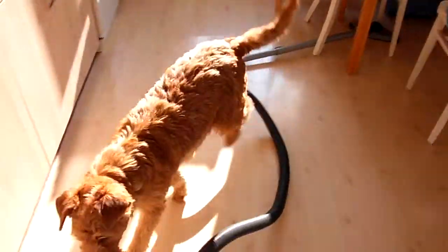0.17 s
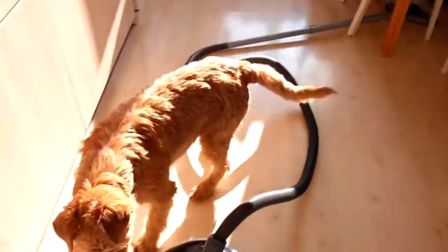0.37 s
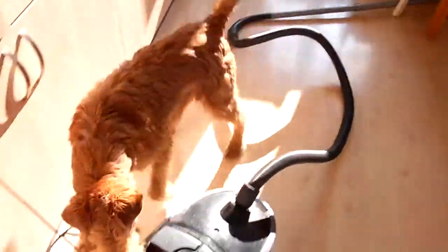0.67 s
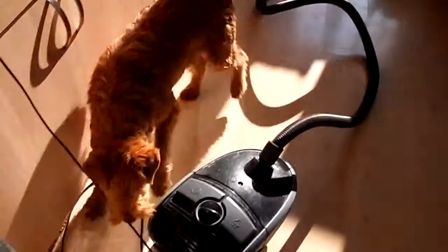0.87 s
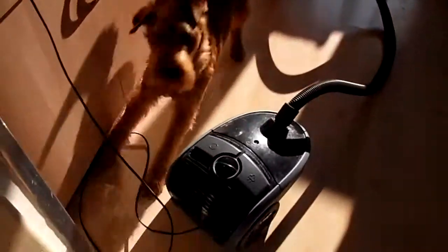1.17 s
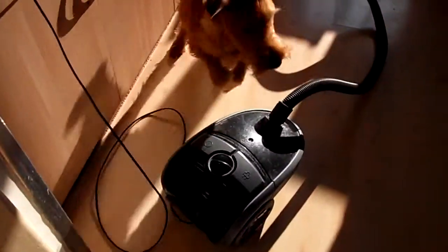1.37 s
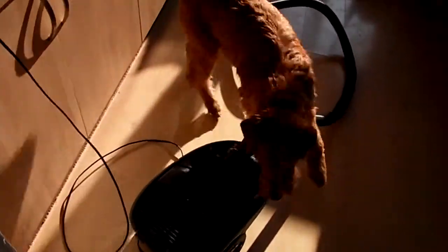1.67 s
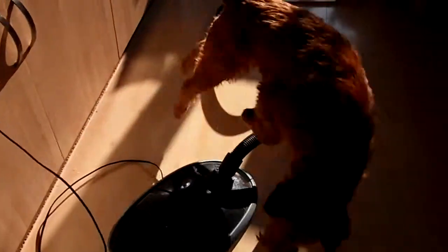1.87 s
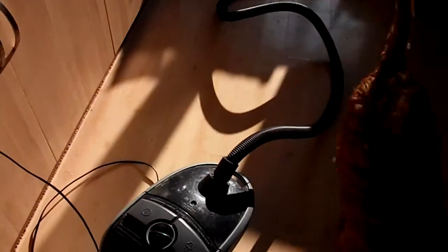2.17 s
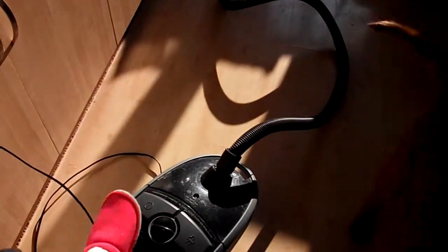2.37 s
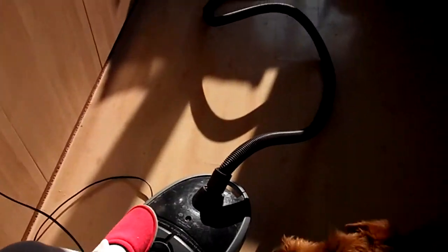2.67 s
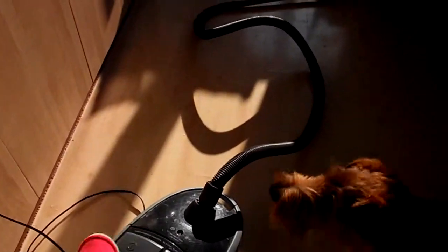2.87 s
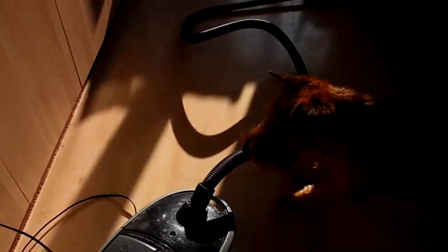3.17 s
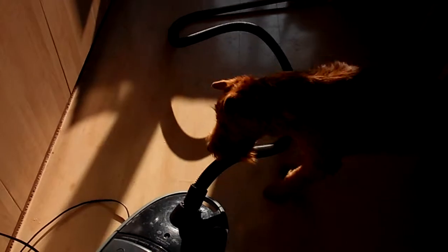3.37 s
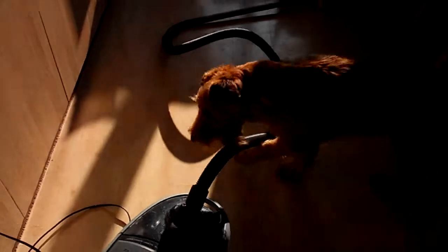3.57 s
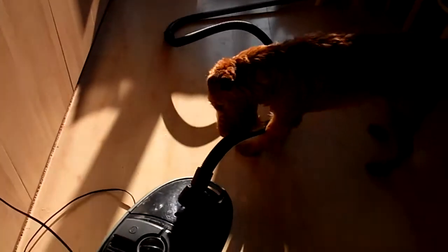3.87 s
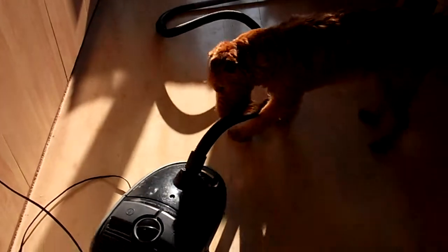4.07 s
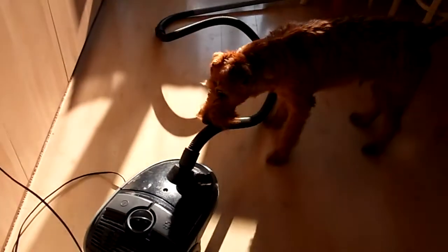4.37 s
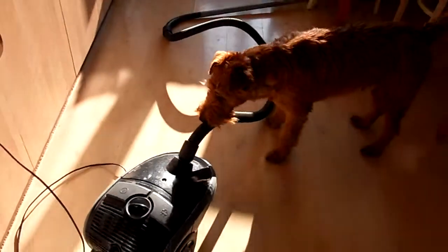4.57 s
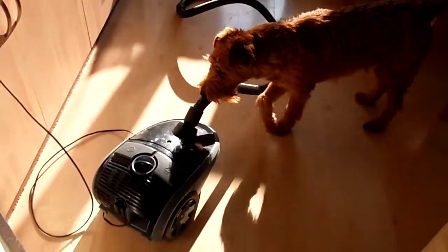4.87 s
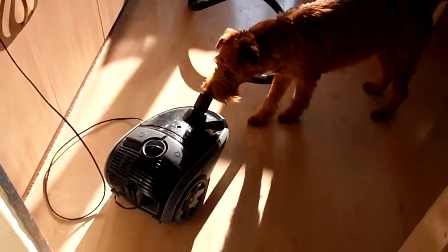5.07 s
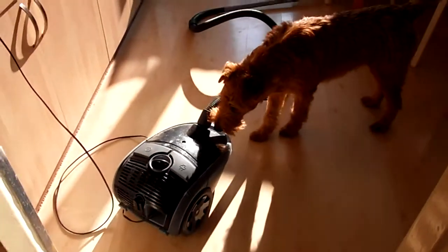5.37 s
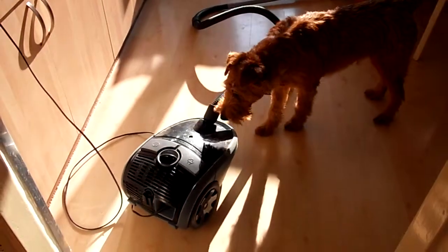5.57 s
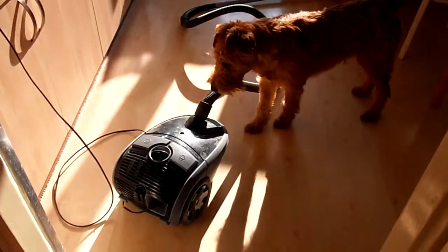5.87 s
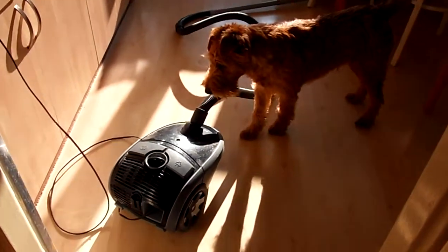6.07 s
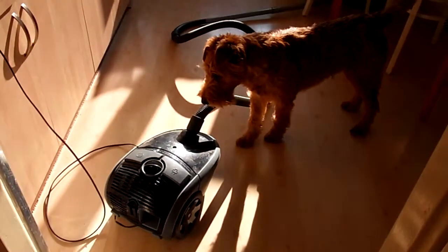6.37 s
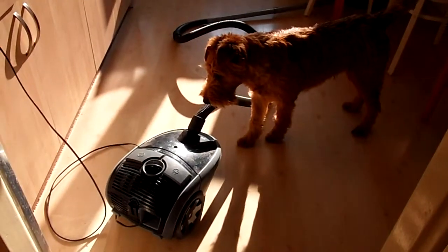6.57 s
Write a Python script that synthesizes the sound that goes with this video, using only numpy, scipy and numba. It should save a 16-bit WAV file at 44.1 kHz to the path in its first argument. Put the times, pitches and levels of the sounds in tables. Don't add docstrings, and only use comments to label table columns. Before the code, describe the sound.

Close in a hard-floored kitchen, a canister vacuum revs up with a rushing roar while a dog growls briefly and woofs through a shut mouth. A hard plastic click switches it off, and the whine and rush slide downward. The dog snarls, gives one fierce bark that distorts the handheld microphone, then grumbles against the hose. Thin hiss and tiny squeaks fade out.

```python
import sys
import numpy as np
from scipy import signal
from scipy.fft import rfft, irfft, next_fast_len
from scipy.io import wavfile
from scipy.ndimage import uniform_filter1d
from numba import njit

SR = 44100
rng = np.random.default_rng(int(sys.argv[2]) if len(sys.argv) > 2 else 0)


def rack_gain(trim_db):
    fader = np.asarray(trim_db, float)
    return 10 ** (fader / 20)


def dump(signal):
    limited = np.clip(np.atleast_2d(signal).T, -1, 1)
    pcm = np.round(limited * 32767).astype(np.int16)
    wavfile.write(sys.argv[1], SR, pcm)


N = 295911

# time in seconds, pitch in Hz, level in dB, length in seconds.
BUMPS = [
    (2.818, 99, -47, .02),
    (3.36, 60, -61, 0.046),
]
# time in seconds, level in dB, push in ms.
CLICKS = [
    (2.642, -8, .15),
    (4.07, -31, 0.26),
]
# mode in Hz, level in dB, T60 in seconds.
PEDAL_MODES = [(638, -5, .03), (862, 8, 0.018), (1610, 1, .03), (2200, -9, .02), (4200, -8, .01)]

START_HZ, GOAL_HZ, SPIN_UP_S, CEILING_HZ = 389.5, 1125.5, 4.267, 704
OFF_S, OFF_HZ, DRAG_KNEE_HZ, DRAG_PER_S = 2.63, 697, 168.56, .19305

# frequency in Hz, density in dB per Hz.
RUNNING_SPECTRUM = [(24, -66), (40, -38.5), (183, -22.5), (301, -11), (390, -21), (440, -14.5), (674, -9.5),
                    (1010, -10.5), (1620, -10.5), (1870, -5), (2940, 3), (5710, -6.5), (7070, -9.5),
                    (10100, -16), (11600, -36.5), (15100, -68), (22000, -120)]
COASTING_SPECTRUM = [(24, -44), (40, -7.5), (103, -23), (144, -17.5), (507, -18.5), (940, -6),
                     (1510, -10.5), (2940, -2), (4290, -15.5), (5070, -14), (9620, -16), (10800, -34),
                     (11600, -51.5), (15100, -79.5), (22000, -120)]
# centre in Hz, width in Hz, boost in dB.
CASING = [(745, 48, -1.5), (1270, 91, 3.5), (1604, 100, 10.5), (2660, 350, 1.5), (2870, 220, -3),
          (10630, 1200, 7)]
# frequency in Hz, correlation from -1 to 1.
LIKENESS = [(60, 0.86), (130, 1), (270, 0.9), (560, 0.78), (1190, 0.035), (2510, 0.26), (5300, -0.2),
            (11200, -0.36)]
# frequency in Hz, left minus right in dB.
LEAN = [(60, -5), (110, -0.5), (190, -1.5), (340, -2), (610, -1.5), (1100, -1.5), (1960, 0.5), (3500, -7),
        (6250, -4), (11200, 8)]
# time in seconds, level in dB, left minus right in dB.
FLOW = [(0, -35.5, -6.5), (.43, -30, -4.5), (1.06, -24.5, -9), (2.26, -19, -6), (2.63, -22, -7.5),
        (2.99, -25.5, -5.5), (3.94, -32.5, -4.5), (4.17, -35, -5.5), (4.65, -35.5, -2), (4.9, -37.5, -5),
        (5.06, -40.5, -7), (5.42, -42.5, -7.5), (5.53, -42.5, -6), (5.6, -45, -6), (5.72, -43, -7.5),
        (6.56, -49.5, -6.5), (6.71, -49, -2)]
START_RUMBLE_DB_PER_OCT, START_RUMBLE_S = 9, 0.29
COAST_TREBLE_DB_PER_OCT, COAST_TOP_DB_PER_OCT = 4.2, -14.5

# start and
# end in seconds, first and last centre in Hz, level in dB.
RIDGES = [(4.5, 5.35, 11000, 7400, -48), (5.2, 6.12, 8050, 7600, -48), (5.98, 7, 7650, 5350, -52.5),
          (4.15, 4.95, 8900, 6900, -51), (4.4, 6.3, 6280, 6180, -51), (5.45, 6.1, 5950, 4700, -49),
          (6.05, 6.8, 4840, 4500, -49), (5.4, 5.85, 10700, 10300, -64.5), (6.4, 6.9, 11300, 10000, -63),
          (1.85, 2.5, 10100, 12000, -38)]
RIDGE_EDGE_S, RIDGE_WIDTH_HZ, RIDGE_FLICKER_DB = 0.088, 720.0, 3

# shaft speed in Hz, level in dB.
SHAFT_LINE = [(108, -85), (122, -63.5), (140, -73.5), (190, -68), (270, -60), (292, -80), (375, -54),
              (700, -63)]
BLADE_LINE = [(110, -71.5), (190, -76), (250, -52), (310, -73), (400, -59), (485, -57), (520, -42),
              (700, -45)]
BAR_LINE = [(110, -81), (132, -74), (155, -46), (250, -50.5), (290, -58), (314, -58), (330, -70.5),
            (700, -78.5)]
OCTAVE_LINE = [(110, -76.5), (148, -64), (160, -54.5), (210, -81), (300, -84), (700, -84.5)]
# centre in Hz, width in Hz, boost in dB.
HOUSING = [(533, 19, 8), (564, 20, 12.5), (692, 40, 17.5), (2850, 270, 4.5), (3830, 120, 11),
           (4736, 120, 7.5), (4984, 160, 9), (5544, 110, 10), (5840, 62, 11.5), (6190, 180, 6.5),
           (7230, 150, 4.5)]
# time in seconds, pitch in Hz, length in seconds, level in dB.
SQUEAKS = [(6.2, 9600, .04, -54), (6.33, 9000, 0.057, -58), (6.6, 10700, 0.038, -52),
           (6.693, 8080, .03, -47.5), (5.683, 10500, .03, -53), (6.579, 11370, 0.035, -60),
           (6.7, 4000, .04, -53)]
POWERED_BLADE_DB, LINE_FLICKER_DB = 4.5, 1.6

# peak in seconds, level in dB, attack and hold in seconds, release in dB per s.
GROWL = ((0, .21, 176, 21, 181, 3), (20, 12, .42, .4, .18, 0.027), [(0, -30, .01, 0.45, 100),
          (.19, -27, 0.019, .002, 3000)])
MUFFLED_WOOF = ((0.15, 0.54, 200, 1000, 223, 4), (9.4, 2, 0.13, 0.2, .245, 0.045),
                 [ (.187, -21, .012, .002, 300), (.212, -11, .011, .028, 800), (.266, -15, .018, .028, 800),
                 (.316, -23, .01, .014, 900), (.39, -40.5, 0.028, 0.052, 400)])
SNARL = ((2.78, 3.0, 120, 61, 200, 0.1), (15, 8, .5, .4, 3.8, .02), [(2.81, -39.5, .03, 0.077, 100.7),
          (2.92, -28.5, .06, 0.089, 450)])
YELP = ((2.96, 3.06, 246, 1580, 353, 20), (0, 0, .03, .06, 3.02, .01), [(3.018, -9, .05, .005, 400)])
BARK = ((3.0, 3.36, 312, 1600, 352, 35), (1, 3, .16, .24, 3.04, .02), [ (3.035, -4.5, .032, .035, 170),
         (3.15, -15, .012, .002, 300), (3.22, -25, .02, .002, 260)])
GRUMBLE = ((3.46, 3.97, 150, 160, 176, 2.8), (1.8, 7.3, 0.24, .3, 3.3, 0.054),
            [ (3.49, -32, 0.022, 0.033, 50), (3.57, -27.5, .07, .04, 61.5),
            (3.66, -23.5, 0.056, 0.017, 130), (3.815, -28.5, 0.15, .01, 200)])
# centre in Hz, width in Hz, level in dB.
LIPS_SHUT = [(121, 50, -22.5), (200, 160, -8), (400, 210, -0.5), (660, 140, -4.5), (1005, 100, -4.5),
             (2000, 270, -10.5)]
CHEEKS = [(168, 40, -21.5), (449, 89, -3), (625, 57, -21), (970, 260, -13.5), (1103, 100, -21),
          (1870, 170, -19)]
JAWS_OPENING = [(342, 200, -22), (650, 260, -1), (1000, 140, -5), (1600, 560, -1), (2210, 400, -9)]
JAWS_WIDE = [(270, 55, -18), (501, 90, -4), (680, 320, -13.5), (1013, 140, 0), (1400, 370, -19),
             (1700, 220, -2), (1947, 110, -11.5), (2002, 110, -7.5), (3000, 1200, -14), (5500, 3000, -25)]
TEETH_ON_HOSE = [(128, 43, -16.5), (166, 70, -11), (271, 45, -9.5), (536, 260, -6.5), (736, 95, 3),
                 (885, 35, -8.5), (989, 140, -1.5), (2094, 170, -3)]
# time in seconds, rate in Hz, depth as a ratio.
FLUTTER = [(3.018, 470, 0), (3.036, 496, 1.6), (3.07, 499, 2.2), (3.11, 503, 1.6), (3.2, 515, 1.2)]
BLAST_DB, BLAST_HZ = -16, 2500

# delay in ms, left level in dB, right level in dB.
BOUNCES = [(2.3, -17.5, -15), (5.1, -17, -14.5), (8.7, -25.5, -16.5), (13.9, -15.5, -9.5)]
KITCHEN_T60_S, KITCHEN_DAMP, LINES_IN_ROOM_DB = 0.4, 0.62, -17


def on_log(hz, table):
    table_hz, values = np.transpose(table)
    return np.interp(np.log(hz), np.log(np.maximum(table_hz, 1)), values)


def curves(table):
    s, *columns = np.transpose(table)
    return [np.interp(np.arange(N) / SR, s, c) for c in columns]


def unit(x):
    return x / np.sqrt(np.mean(x ** 2))


def walk(rate_hz):
    hold = int(SR / rate_hz)
    levels = rng.standard_normal(1000)
    steps = np.repeat(levels[:N // hold + 1], hold)
    return uniform_filter1d(uniform_filter1d(steps, hold), hold)[:N]


def lorentz(hz, peaks):
    return sum(db / (1 + (2 * (hz - centre) / width) ** 2) for centre, width, db in peaks)


@njit
def svf(x, hz, width_hz):
    y, band, low = np.empty(len(x)), 0., 0.
    for i in range(len(x)):
        g, k = np.tan(np.pi * hz[i] / SR), width_hz / hz[i]
        v = (band + g * (x[i] - low)) / (1 + g * (g + k))
        band, low, y[i] = 2 * v - band, low + 2 * g * v, k * v
    return y


def handling():
    lowpass = signal.butter(2, 70, fs=SR, output="sos")
    low = signal.sosfilt(lowpass, rng.standard_normal((2, N)))
    return unit(low) * rack_gain(-72.5 + 3 * walk(4))


def bumps():
    t = np.arange(N) / SR
    return sum(rack_gain(db) * np.exp(-((t - s) / length_s) ** 2) * np.sin(2 * np.pi * hz * t)
               for s, hz, db, length_s in BUMPS)


def clicks():
    t = np.arange(SR // 8) / SR
    out = np.zeros(N)
    for s, db, push_ms in CLICKS:
        ring = sum((-1) ** k * rack_gain(mode_db) * np.sin(2 * np.pi * hz * t) * 1000. ** (-t / t60_s)
                   for k, (hz, mode_db, t60_s) in enumerate(PEDAL_MODES))
        ring += 0.52 * rng.standard_normal(len(t)) * np.exp(-t / 0.0023)
        push = signal.windows.hann(int(push_ms * SR / 1000) + 3)
        ring = np.convolve(ring, push)[:len(t)]
        first = int(s * SR)
        out[first:first + len(t)] += rack_gain(db) * ring / np.abs(ring).max()
    return signal.sosfilt(signal.butter(2, 450, "highpass", fs=SR, output="sos"), out)


def shaft():
    t = np.arange(N) / SR
    driven = np.minimum(GOAL_HZ - (GOAL_HZ - START_HZ) * np.exp(-t / SPIN_UP_S), CEILING_HZ)
    angle = np.arctan(OFF_HZ / DRAG_KNEE_HZ) - DRAG_PER_S * np.maximum(t - OFF_S, -.05)
    coast = DRAG_KNEE_HZ * np.tan(angle)
    return uniform_filter1d(np.minimum(driven, coast), size=SR // 25)


def bearings():
    t, out = np.arange(N) / SR, np.zeros((2, N))
    flicker = rack_gain(RIDGE_FLICKER_DB * walk(11))
    for start_s, end_s, first_hz, last_hz, db in RIDGES:
        a, b = int(start_s * SR), min(int(end_s * SR), N)
        here = t[a:b]
        hz = np.interp(here, [start_s, end_s], [first_hz, last_hz])
        swell = rack_gain(db) * np.clip(np.minimum(here - start_s, end_s - here) / RIDGE_EDGE_S, 0, 1)
        for ear in range(2):
            noise = rng.standard_normal(2 * SR)[:b - a]
            hiss = svf(svf(noise, hz, RIDGE_WIDTH_HZ), hz, RIDGE_WIDTH_HZ)
            out[ear, a:b] += swell * unit(hiss) * np.roll(flicker, rng.integers(N))[a:b]
    return out


def air(shaft_hz):
    level_db, pan_db = curves(FLOW)
    bass_db = START_RUMBLE_DB_PER_OCT * np.exp(-np.arange(N) / SR / START_RUMBLE_S)
    size = next_fast_len(N)
    f = np.maximum(np.arange(size // 2 + 1) * SR / size, 1)
    casing = rack_gain(lorentz(f, CASING) + on_log(f, RUNNING_SPECTRUM))
    mid, side = (rfft(rng.standard_normal(size)) * casing for _ in range(2))
    norm = np.sqrt(2 * np.sum(np.abs(mid[(f > 2400) & (f < 4500)]) ** 2)) / size
    slow = np.clip((420 - shaft_hz) / 280, 0, 1) * (np.arange(N) > N // 3)
    out, gust = 0, walk(3.46)
    for hz in 40 * 2 ** (np.arange(26) / 3):
        window = np.cos(np.pi / 2 * np.clip(3 * np.log2(f / hz), -1, 1))
        like = np.clip(on_log(hz, LIKENESS), -.9, .99)
        m = np.sqrt(1 + like) * irfft(mid * window, size)[:N]
        s = np.sqrt(1 - like) * irfft(side * window, size)[:N]
        octaves = np.log2(hz / 3200)
        treble = max(octaves, 0)
        db = slow * (on_log(hz, COASTING_SPECTRUM) - on_log(hz, RUNNING_SPECTRUM))
        db = db + COAST_TREBLE_DB_PER_OCT * slow * treble
        db = db + COAST_TOP_DB_PER_OCT * slow ** 2 * max(octaves - 1.2, 0)
        db = db + bass_db * min(-octaves, 2) * (octaves < 0)
        db = db + 1.1 * gust + (0.83 + .5 * treble) * walk(11)
        lean_db = on_log(hz, LEAN) + min(hz / 2500, 1) * (pan_db + 6.5)
        gain = rack_gain(db + np.array([lean_db, -lean_db]) / 2)
        out = out + gain * np.array([m + s, m - s]) / np.sqrt(1 + like)
    return out * rack_gain(level_db - 2.0) / norm


def motor(shaft_hz):
    t = np.arange(N) / SR
    turn = 2 * np.pi * np.cumsum(shaft_hz * (1 + .0015 * walk(60))) / SR
    powered_db = POWERED_BLADE_DB * np.clip((OFF_S - t) / 0.065, 0, 1)
    out = np.zeros(N)
    for order, line in ((1, SHAFT_LINE), (9, BLADE_LINE), (18, BAR_LINE), (36, OCTAVE_LINE)):
        db = on_log(shaft_hz, line) + lorentz(order * shaft_hz, HOUSING) + 6.0
        db = db + (order == 9) * powered_db + LINE_FLICKER_DB * walk(14)
        out += rack_gain(db) * np.sin(order * turn)
    for s, hz, length_s, db in SQUEAKS:
        order = hz / shaft_hz[int(s * SR)]
        out += rack_gain(db + 3 * walk(120)) * np.exp(-((t - s) / length_s) ** 2) * np.sin(order * turn)
    return out


def blast():
    t = np.arange(N) / SR
    lowpass = signal.butter(1, BLAST_HZ, fs=SR, output="sos")
    rush = signal.sosfilt(lowpass, rng.standard_normal((2, N)))
    return unit(rush) * rack_gain(BLAST_DB) * np.exp(-((t - 3.06) / .035) ** 2)


@njit
def folds(hz, rough, weak, chance):
    pulses, phase, p, k = np.zeros(len(hz) + 1), np.empty(len(hz)), 0., 0
    for i in range(len(hz)):
        step = hz[i] * np.exp(rough[i] * chance[k, 0]) / SR
        p += step
        if p >= 1:
            p, k = p - 1, k + 1
            size = np.exp(rough[i] * chance[k, 1]) * (weak[i] if k % 2 else 1.)
            pulses[i] += size * p / step
            pulses[i + 1] += size * (1 - p / step)
        phase[i] = p
    return pulses[:-1], phase


def effort(pushes, t):
    power = 0
    for s, db, attack_s, hold_s, release in pushes:
        swell = np.sin(np.pi / 2 * np.clip((t - s) / max(attack_s, .001) + 1, 0, 1)) ** 2
        power = power + (swell * rack_gain(db - release * np.maximum(t - s - hold_s, 0))) ** 2
    return np.sqrt(power) * np.clip((t[-1] - t) / 0.02, 0, 1)


def voice(call, throat, flutter=None):
    pitch, fold_state, pushes = call
    start_s, end_s, first_hz, climb, top_hz, sag = pitch
    weak_db, late_db, rough, late_rough, change_s, blend_s = fold_state
    a, b = int(start_s * SR), int(end_s * SR)
    t = np.arange(a, b) / SR
    hz = np.minimum(first_hz + climb * (t - start_s), top_hz - sag * (t - start_s))
    later = np.clip((t - change_s) / (2 * max(blend_s, .001)) + .5, 0, 1)
    rough = np.clip(rough + (late_rough - rough) * later, 0, 1)
    weak = rack_gain(-weak_db - (late_db - weak_db) * later)
    chance = rng.standard_normal((400, 2)) * [.2, .55]
    pulses, phase = folds(hz, rough, weak, chance)
    if flutter:
        flutter_hz, depth = (c[a:b] for c in curves(flutter))
        wobble = 1 + .03 * walk(90)[a:b]
        pulses = pulses * (1 + depth * np.cos(2 * np.pi * np.cumsum(flutter_hz * wobble) / SR))
    breath = rng.standard_normal(SR)[:b - a] * np.exp(-phase / 0.22)
    source = unit(pulses) + 2.73 * rough * unit(breath)
    rung = np.zeros(b - a)
    for k, (centre_hz, width_hz, db) in enumerate(throat):
        centre = centre_hz * np.ones(b - a)
        formant = svf(svf(source, centre, 1.4 * width_hz), centre, 1.4 * width_hz)
        rung += (-1) ** k * rack_gain(db) * unit(formant)
    out = np.zeros(N)
    out[a:b] = unit(rung) * effort(pushes, t)
    return out


def ports(x, pan_db, lag_samples):
    right = np.interp(np.arange(N) - lag_samples, np.arange(N), x)
    return np.array([x * rack_gain(pan_db / 2), right * rack_gain(-pan_db / 2)])


@njit
def walls(x, lags, gain, damp):
    line, soft, out = np.zeros((8, 4096)), np.zeros(8), np.zeros((2, len(x)))
    for i in range(len(x)):
        total = 0.
        for k in range(8):
            soft[k] += (1 - damp) * (gain[k] * line[k, (i - lags[k]) & 4095] - soft[k])
            total += soft[k]
            out[k % 2, i] += soft[k]
        for k in range(8):
            line[k, i & 4095] = x[i] + soft[k] - total / 4
    return out


def kitchen(x):
    lags = rng.integers(500, 2400, 8)
    return walls(x + 1e-18, lags, rack_gain(-60 * lags / SR / KITCHEN_T60_S), KITCHEN_DAMP)


def bounced(direct):
    out, index = direct.copy(), np.arange(N)
    for delay_ms, *side_db in BOUNCES:
        late = index - (delay_ms + 0.249 * walk(1.2)) * SR / 1000
        for ear, db in enumerate(side_db):
            out[ear] += rack_gain(db) * np.interp(late - 2.2 * ear, index, direct[ear])
    return out * rack_gain(-1.54)


def scene():
    shaft_hz = shaft()
    early_dog = voice(GROWL, LIPS_SHUT) + voice(MUFFLED_WOOF, CHEEKS)
    late_dog = voice(SNARL, LIPS_SHUT) + voice(YELP, JAWS_OPENING)
    late_dog += voice(BARK, JAWS_WIDE, FLUTTER) + voice(GRUMBLE, TEETH_ON_HOSE)
    lines, pedal = motor(shaft_hz), clicks()
    near = ports(early_dog, 0.22, 2.1) + ports(late_dog, -5.4, 3.44) + ports(pedal, -2.2, 2.5)
    near = near + air(shaft_hz) + bearings() + blast()
    room = kitchen(rack_gain(-8.5) * (early_dog + late_dog + pedal) + rack_gain(LINES_IN_ROOM_DB) * lines)
    return bounced(near) + ports(lines, -5.0, 1) + room + handling() + bumps()


def top_cut(x):
    return signal.sosfilt(signal.butter(12, 11780, fs=SR, output="sos"), x)


def record(dry):
    thin = signal.sosfilt(signal.butter(1, 50, "highpass", fs=SR, output="sos"), dry)
    return top_cut(np.clip(thin, -1, 1))


dry = scene()
out = record(dry)
dump(out)
```